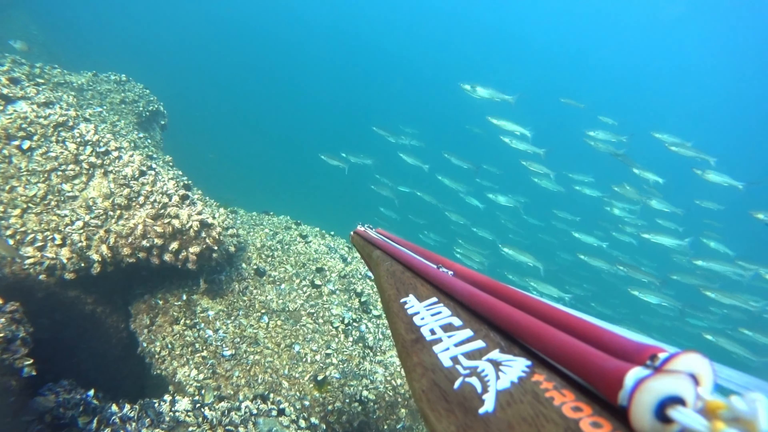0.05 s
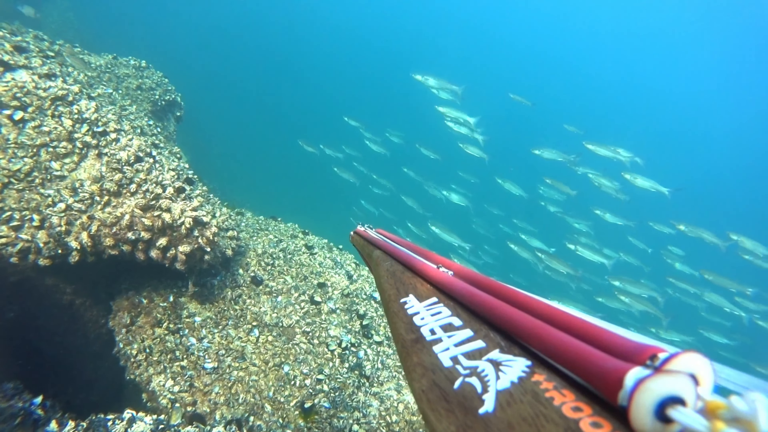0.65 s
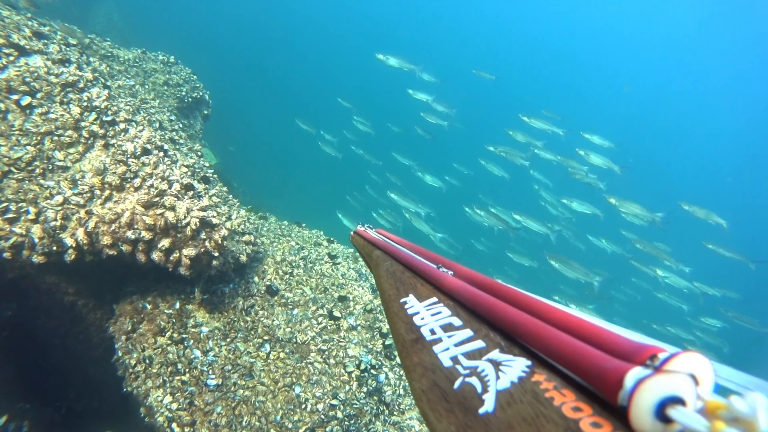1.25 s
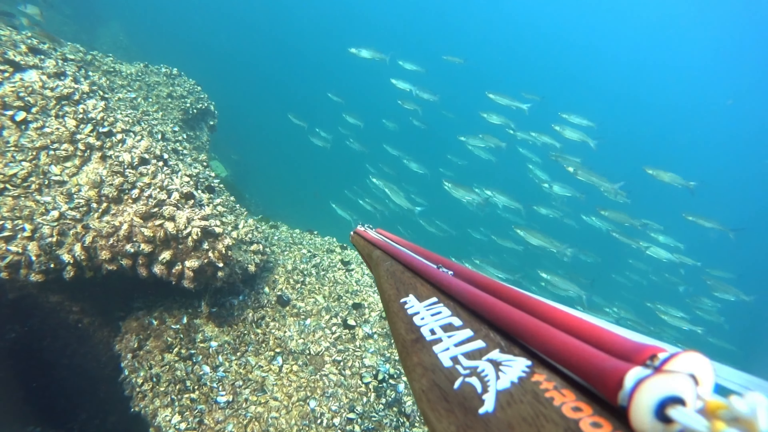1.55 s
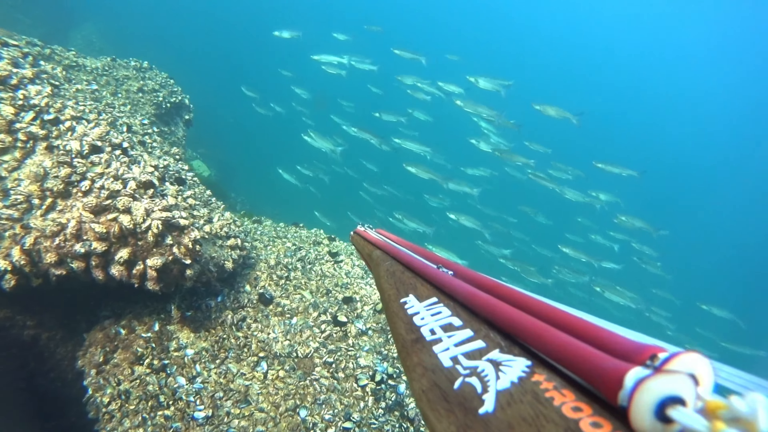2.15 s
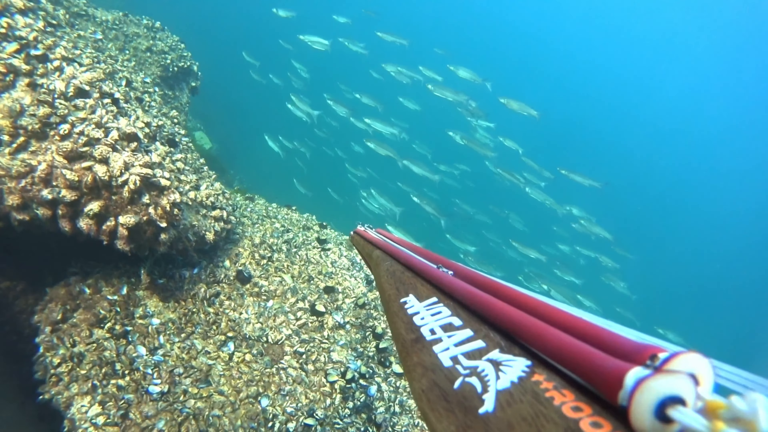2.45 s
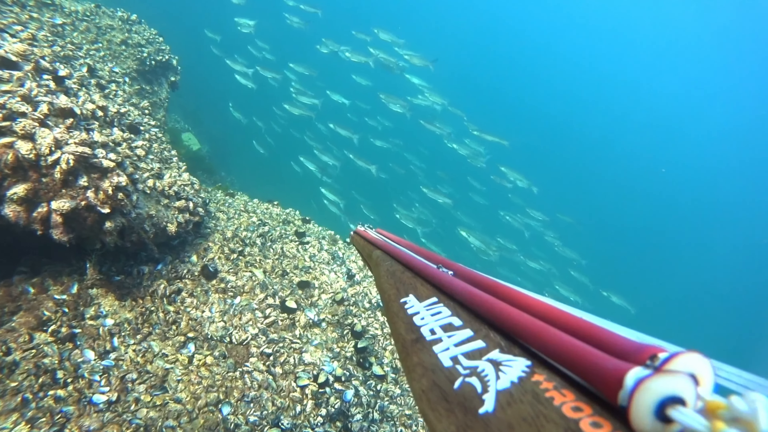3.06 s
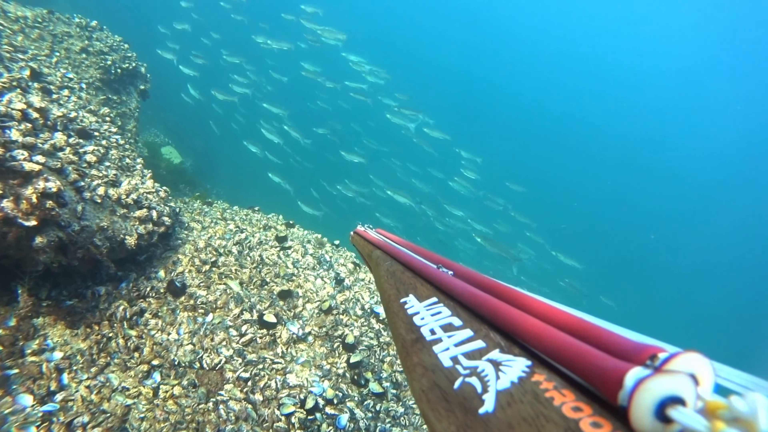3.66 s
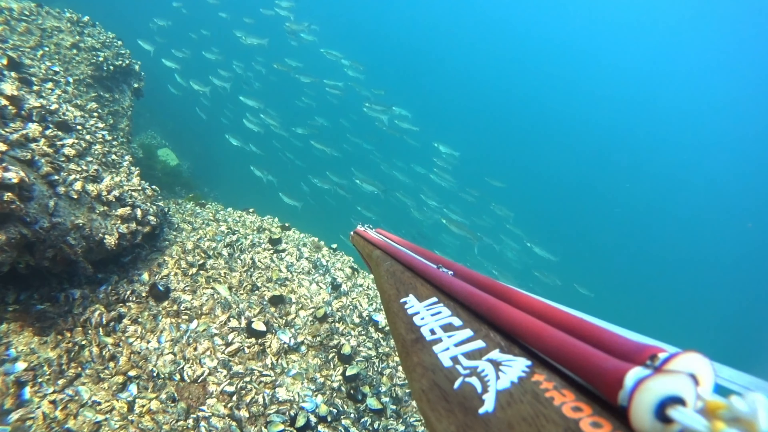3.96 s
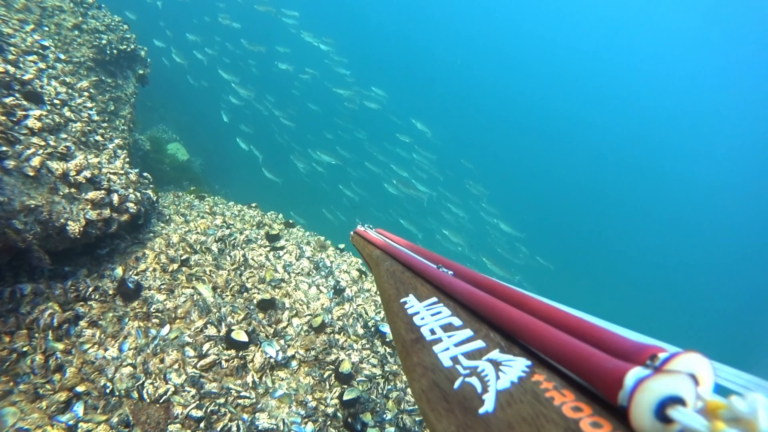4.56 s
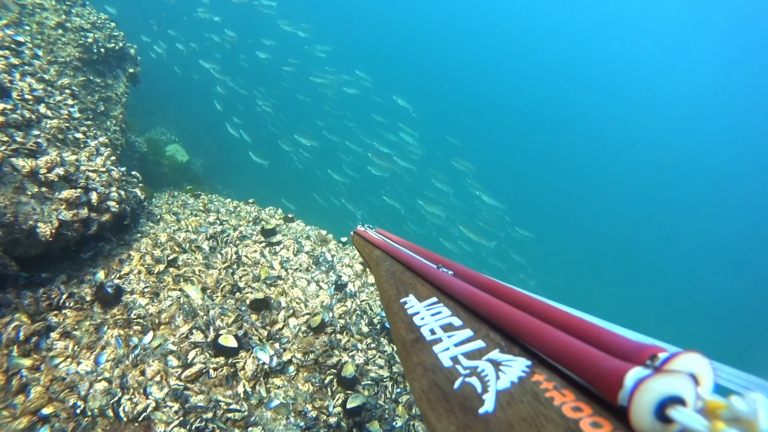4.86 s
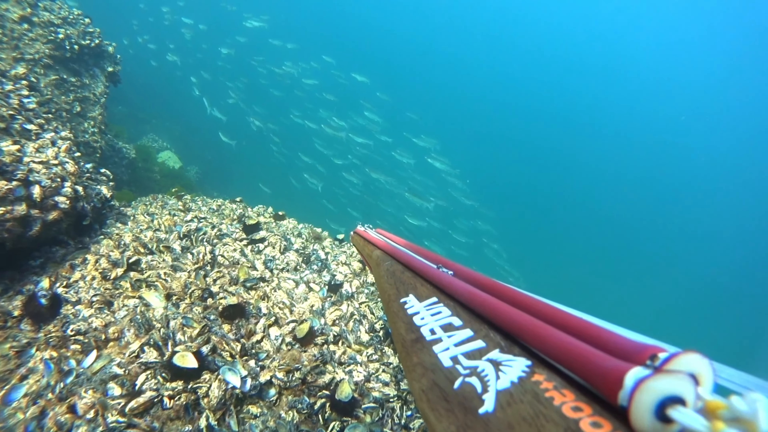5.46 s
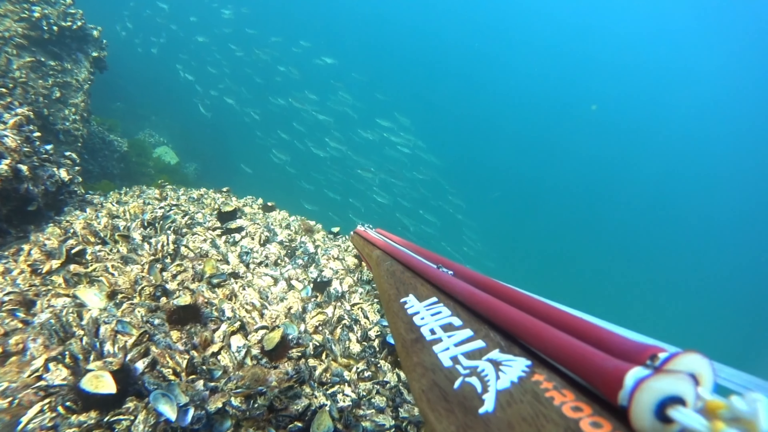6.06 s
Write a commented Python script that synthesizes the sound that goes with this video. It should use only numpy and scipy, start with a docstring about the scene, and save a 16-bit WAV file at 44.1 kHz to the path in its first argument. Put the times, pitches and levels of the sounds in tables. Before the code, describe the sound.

Underwater near rocks, snapping shrimp crackle faintly all around over a soft hiss, heard from inside a sealed camera housing. From about a second in, the mount sticks and slips in short, close creaks, with a few dull bumps among them. Near the end, four hard knocks strike the housing. They are the loudest sounds, and each leaves a brief low ring.

```python
"""Snapping shrimp crackle all around over a soft hiss, underwater near mussel-covered rocks.
The two microphones sit inside a sealed camera housing on a speargun and hear the sea through its walls.
From about a second in, the mount sticks and slips as the gun is moved: close creaks, a few dull bumps.
Four hard knocks near the end ring the housing, which hums on low after each."""
import sys
import numpy as np
from scipy import signal
from scipy.fft import irfft
from scipy.io import wavfile
from scipy.ndimage import uniform_filter1d

SR = 44100
rng = np.random.default_rng(int(sys.argv[2]) if len(sys.argv) > 2 else 0)


def transcribe(u):
    """Save the signal u as a 16-bit wav file named by the first command-line argument.

    u: samples, shape (n,) or (channels, n), limited to [-1, 1]; the rate is SR.
    q: integer samples, one column per channel.
    """
    v = np.clip(np.atleast_2d(u).T, -1, 1)
    q = np.round(v * 32767).astype(np.int16)
    wavfile.write(sys.argv[1], SR, q)


N = 278271
SIDES = np.array([.5, -.5])  # each microphone's share of a left-right offset


def gain_of(db):
    """Decibels to amplitude."""
    return 10 ** (np.asarray(db) / 20)


def rms(x):
    """Root mean square."""
    return np.sqrt(np.mean(x ** 2) + 1e-24)


def curve_at(points, hz):
    """A spectrum table, joined on a log-frequency axis."""
    f, value = np.transpose(points)
    return np.interp(np.log(hz + 1), np.log(f), value)


def add(mix, s, sound):
    """Mixes a stereo sound in at time s."""
    part = mix[:, max(round(s * SR), 0):][:, :sound.shape[1]]
    part += sound[:, :part.shape[1]]


def now_and_then(start, per_s, spread_db, count=100):
    """Irregular events at a given rate: (time [s], level about the mean [dB])."""
    when, strength = rng.random((count, 2)).T
    rows = np.c_[start + (np.arange(count) + when) / per_s, spread_db * (2 * strength - 1)]
    return rows[rows[:, 0] < N / SR]


def burst(t60, rise=0.000047, size=2048):
    """One sharp pop, scattered into a dense train of short echoes."""
    t = np.arange(size) / SR
    return rng.standard_normal(size) * gain_of(-60 * t / t60) * (1 - np.exp(-t / rise))


# The sea reaches the two microphones out of step: (frequency [Hz], left lead [rad])
WALL_LEAD = [(100, 1), (240, 1.9), (400, -1.1), (520, .9), (660, 2.1), (800, 1.5), (1050, 1.5), (1200, 1),
             (1450, 1.2), (1700, 1.6), (2000, 1.3), (2400, 2), (3500, 2), (4800, 1.8), (5800, 1.2),
             (8000, .8)]
def through_wall(x, colour, skew=0, size=2048):
    """Colours a sound and splits its phase between the microphones, skewed by its direction."""
    hz = np.fft.rfftfreq(size, 1 / SR)
    log_gain = np.log(gain_of(curve_at(colour, hz)))
    mirrored = np.r_[log_gain, log_gain[-2:0:-1]]
    causal = np.exp(np.conj(signal.hilbert(mirrored)))[:len(hz)]  # minimum phase
    phase = np.outer(SIDES, curve_at(WALL_LEAD, hz) + skew)
    early = size // 64  # room for the leading side
    taps = np.roll(irfft(causal * np.exp(1j * phase)), early, 1)[:, :size // 2]
    return signal.oaconvolve(x[None], taps, axes=1)[:, early:early + len(x)]


# The far reef, heard from inside the housing: (frequency [Hz], relative level [dB])
WASH_COLOUR = [(25, -11), (60, -30), (95, -14), (170, -21), (236, -2), (285, -16), (380, -1.5), (640, 2.5),
               (800, 1.5), (1000, 1), (1150, -4.5), (1500, -6), (1900, -8.5), (3300, -13.5), (4800, -16.5),
               (6200, -11.5), (7600, -18.5), (11000, -21.5)]
# Its loudness at the microphones: (time [s], level [dB])
WASH_LEVEL = [(0, -61), (1.2, -60.5), (2, -61), (4, -60.5), (6.3, -60)]
def reef_wash(flutter_db=-0.54, apart_db=-16):
    """The most distant snaps and moving water merge into a fluttering hiss."""
    flutter = uniform_filter1d(rng.standard_normal(N), SR // 40)
    hiss = rng.standard_normal(N) * gain_of(flutter_db * flutter / rms(flutter))
    shared = through_wall(hiss, WASH_COLOUR, size=8192)
    apart = through_wall(rng.standard_normal(N), WASH_COLOUR, size=8192) * [[1], [-1]]
    x = shared + gain_of(apart_db) * apart
    level_db = np.interp(np.arange(N) / SR, *np.transpose(WASH_LEVEL))
    return gain_of(level_db) * x / rms(x)


# A snap through the wall, its bright tick and its lower ring: (frequency [Hz], relative level [dB])
TICK_COLOUR = [(1500, -21), (2800, -6.5), (4200, -2), (5200, 0), (6100, 5.5), (7500, -5.5), (9000, -2.5),
               (11000, -11.5)]
RING_COLOUR = [(300, -19.5), (650, -19), (900, 3.5), (1150, -2), (1450, 8), (1700, 0.5), (2000, -3.5),
               (2400, -4), (3200, -15.5), (5000, -37.5)]
def shrimp_crackle(colour, per_s, db, t60, spread_db, skew_rad=0.99, directions=10):
    """Many shrimp at middle distance, all around, snap at random with uneven strength."""
    x = np.zeros((2, N))
    for _ in range(directions):
        strength = gain_of(spread_db * np.minimum(rng.exponential(1, N), 3))
        pop = through_wall(burst(t60), colour, skew_rad * rng.standard_normal())
        fires = rng.random(N) < per_s / directions / SR
        x += signal.oaconvolve((strength * fires)[None], pop, axes=1)[:, :N]
    return gain_of(db) * x / rms(x)


# Modes of the housing, right around the microphones:
# (frequency [Hz], t60 [s], knocked level [dB], left over right [dB], relative rubbed level [dB])
HOUSING_MODES = [(39.6, 0.67, -68, -23, -72), (90.7, 0.54, -60, 10.5, -46.5), (238.9, 0.39, -26, 3, -16.5),
                 (306.5, 0.3, -50, 8.5, -32), (381, 0.12, -10.5, -3, -7), (477.8, 0.057, -14, 3.5, -4),
                 (546.6, 0.034, -7.5, 0, -7.5), (607, 0.037, -6.5, 5.5, -6), (649.4, 0.066, -15, 0, -22),
                 (796, 0.034, -17.5, -18.5, -16.5), (871, 0.039, -5, -1, -3.5),
                 (934.4, 0.079, -10, -3, -11.5), (996.5, 0.062, -13.5, 12, -14.5),
                 (1133, 0.023, -7.5, -0.5, -3.5), (1310, 0.019, 1.5, -1, 5.5), (1454, 0.011, 15.5, -1.5, 6),
                 (1847, 0.024, -16, -15.5, -13.5), (1964, 0.012, -6.5, 11.5, -1.5),
                 (2374, 0.0069, -36, 2.5, -8)]
MODE_HZ, MODE_T60, KNOCKED_DB, PAN_DB, RUBBED_DB = np.transpose(HOUSING_MODES)
# The left wall against the right, mode by mode: (left lead [rad])
MODE_PHASE = [0, .8, 2.1, -3.7, -1.2, -1.2, .4, 2.8, 1.8, 1.1, 1.3, -3.7, 2.2, 2, 2.6, 2.7, .8, -1.6, 2.3]
def housing(t, level_db, build_s=0.0069):
    """Each mode's ring at both microphones; neighbours swing in opposite sense and build up briefly."""
    side = SIDES[:, None, None]
    sense = (-1) ** np.arange(len(MODE_HZ))[:, None]
    phase = 2 * np.pi * MODE_HZ[:, None] * t + side * np.array(MODE_PHASE)[:, None]
    ring_db = level_db[:, None] + side * PAN_DB[:, None] - 60 * t / MODE_T60[:, None]
    return sense * np.sin(phase) * gain_of(ring_db) * (1 - np.exp(-t / build_s))


def housing_hum(db=-79):
    """The moving water keeps two low modes of the housing faintly humming."""
    t = np.arange(SR // 2) / SR
    ring = ((MODE_HZ > 80) & (MODE_HZ < 300)) @ housing(t, RUBBED_DB)
    water = rng.standard_normal((1, N + len(t) - 1))
    x = signal.oaconvolve(water, ring, "valid", axes=1)
    return gain_of(db) * x / rms(x)


def snap(tick_db, ring_db, reference_t60=.017, reference_db=-57.5, halving_db=30, skew_rad=0.076):
    """A shrimp's bubble collapses: a bright tick, and a longer, lower ring in the wall."""
    t60 = reference_t60 * 2 ** ((reference_db - tick_db) / halving_db)  # louder is nearer, so drier
    out = 0
    for colour, db, decay in ((TICK_COLOUR, tick_db, t60), (RING_COLOUR, ring_db, 1.77 * t60)):
        pop = through_wall(burst(decay), colour, skew_rad * rng.standard_normal())
        out = out + gain_of(db) * pop / rms(pop[:, :SR // 125])
    return out


# The shrimp closest to the microphones: (time [s], tick level [dB], ring level [dB])
NEAR_SNAPS = [(.0901, -54.5, -46.5), (.1412, -58.5, -49.5), (.3313, -52, -50), (.3969, -49, -44.5),
              (.6634, -52.5, -46.5), (0.706, -77, -55), (.9406, -53.5, -58), (1.1581, -58, -55),
              (1.2052, -53.5, -63), (1.226, -51, -48.5), (1.7017, -55.5, -59.5), (1.8816, -57, -67),
              (2.2257, -64, -53.5), (2.4396, -54, -62), (2.4765, -58.5, -47.5), (3.3443, -51.5, -64),
              (3.564, -60.5, -51), (3.66, -50.5, -48.5), (3.6983, -46.5, -59), (3.8265, -34, -41.5),
              (3.9343, -55.5, -53.5), (4.0528, -53, -51.5), (4.2597, -47.5, -64), (4.4634, -48, -51),
              (4.9162, -54, -51), (5.192, -60, -55), (5.3691, -51, -49), (5.9342, -57, -43),
              (6.1136, -58, -47.5), (6.157, -57, -54.5)]
def near_shrimp(stray_tick_db=-62.5, stray_ring_db=-67.5):
    """The nearest shrimp, and stray snaps from the rocks just beyond."""
    out = np.zeros((2, N))
    for s, tick_db, ring_db in NEAR_SNAPS:
        add(out, s, snap(tick_db, ring_db))
    for s, db in now_and_then(0, per_s=5, spread_db=3):
        add(out, s, snap(stray_tick_db + db, stray_ring_db + db))
    return out


def creak(modes, length, low_db, upper_db, slips_per_s=1500, spread_db=3, vary_db=1.5, scrape_db=-11):
    """The mount sticks and slips: one firm kick and a short run of uneven ones drive the housing."""
    n = int(length * SR)
    chance, size, sign = rng.random((3, SR // 10))[:, :n]
    kicks = (chance < slips_per_s / SR) * gain_of(-spread_db * np.log(size)) * np.sign(sign - .5)
    kicks *= np.sqrt(np.hanning(n))
    kicks[n // 14] += 2  # the firm kick
    # each place of contact drives the modes with its own strengths and signs
    spot = gain_of(vary_db * rng.standard_normal(len(MODE_HZ))) * rng.choice([-1, 1], len(MODE_HZ))
    is_low = MODE_HZ < 700
    low, upper = (spot * is_low) @ modes, (spot * ~is_low) @ modes
    # the many weak modes of the mount blur into a scrape
    scrape = through_wall(burst(t60=0.014), RING_COLOUR)
    out = np.zeros((2, n + modes.shape[-1]))
    for db, response in ((low_db, low), (upper_db, upper), (upper_db + scrape_db, scrape)):
        ring = signal.fftconvolve(kicks[None], response, axes=1)
        add(out, 0, gain_of(db) * ring / rms(ring[:, :n + SR // 160]))
    return out


# The mount, hard against the housing: (time [s], length [s], low level [dB], upper level [dB])
FIRM_CREAKS = [(1.02, .009, -47, -44), (1.371, 0.0084, -54.5, -45), (1.413, .017, -52.5, -52),
               (1.543, 0.014, -53, -56.5), (1.752, 0.0046, -54, -49.5), (2.137, .033, -47.5, -46.5),
               (2.312, 0.0073, -37.5, -44), (2.327, .017, -52, -41.5), (2.356, .009, -42, -33.5),
               (2.518, 0.015, -44, -40.5), (2.615, 0.0076, -53, -49), (2.63, 0.012, -49, -41.5),
               (2.648, 0.011, -46.5, -37), (2.751, 0.03, -66, -52), (2.893, 0.018, -51, -40.5),
               (2.955, 0.0099, -53, -46.5), (3.046, 0.014, -50, -42.5), (3.245, 0.007, -53, -52),
               (3.268, 0.014, -44, -48), (3.399, .014, -57, -48), (3.583, 0.011, -62, -48.5),
               (3.64, 0.0094, -51.5, -51), (3.703, 0.0067, -61, -44.5), (3.719, .014, -51, -45),
               (4.034, 0.024, -52, -53), (4.061, 0.04, -51, -50.5), (4.238, 0.0088, -53, -42.5),
               (4.417, 0.024, -47.5, -46.5), (4.55, 0.074, -50, -49), (4.657, 0.02, -49, -42),
               (4.812, 0.019, -49.5, -48), (4.844, 0.034, -49.5, -47), (5.005, 0.018, -53, -47.5),
               (5.166, .017, -50.5, -48), (5.183, .026, -49.5, -49), (5.43, .014, -57, -43),
               (5.549, 0.051, -48, -45), (5.74, 0.046, -58.5, -51), (5.788, 0.015, -50.5, -44),
               (5.973, 0.052, -53.5, -46.5)]
def mount_creaks(stick_s=0.02, stick_spread_s=0.02, settle_db=-15.5, moving_from_s=1.7):
    """Firm creaks, each sticking, then settling with a weaker one; faint ones once the gun is moving."""
    out, t = np.zeros((2, N)), np.arange(SR // 3) / SR
    modes = housing(t, RUBBED_DB, build_s=0.0026)
    for s, length, low_db, upper_db in FIRM_CREAKS:
        add(out, s, creak(modes, length, low_db, upper_db))
        settles = s + length + stick_s + stick_spread_s * rng.random()
        add(out, settles, gain_of(settle_db) * creak(modes, .012, low_db, upper_db))
    for s, db in now_and_then(moving_from_s, per_s=6, spread_db=4):
        add(out, s, gain_of(db) * creak(modes, length=.012, low_db=-59.5, upper_db=-56))
    return out


# Dull bumps on the housing, a little to the left: (time [s], level [dB], frequency [Hz], t60 [s])
DULL_BUMPS = [(2.3106, -33.5, 174, 0.065), (2.336, -36.5, 240.2, 0.3), (2.639, -42.5, 236.8, 0.26),
              (4.6, -45, 237.4, 0.44)]
def bumps(push_db=-24, push_t60=0.021, rise_s=0.015):
    """A soft blow: a low thud with a brief push on the wall."""
    out, t = np.zeros((2, N)), np.arange(SR // 2) / SR
    push = gain_of(push_db - 60 * t / push_t60)
    for s, db, hz, t60 in DULL_BUMPS:
        thud = np.sin(2 * np.pi * hz * t) * gain_of(-60 * t / t60) * (1 - np.exp(-t / rise_s))
        add(out, s, gain_of(db) * np.outer([1, .7], thud + push))
    return out


# Hard knocks on the housing, right at the microphones: (time [s], ring gain [dB], crack level [dB])
HARD_KNOCKS = [(5.265, 0.5, -34), (5.637, 0, -32), (5.9101, 1, -29), (6.237, 1.5, -30)]
# The crack at the contact, heard from inside: (frequency [Hz], relative level [dB])
CRACK_COLOUR = [(1500, -14), (2500, -1.5), (3200, -1), (3800, 3.5), (5000, -6), (5550, 10), (6300, -2),
                (7400, -7), (8400, -3.5), (11000, -21.5)]
def knocks(tail_db=-33, tail_t60=0.059, crack_t60=0.013, rise_s=0.0022, vary_db=0.56):
    """Each knock cracks at the contact and sets all modes ringing."""
    out, t = np.zeros((2, N)), np.arange(SR * 5 // 4) / SR
    modes = housing(t, KNOCKED_DB)
    for s, db, crack_db in HARD_KNOCKS:
        spot = gain_of(vary_db * rng.standard_normal((len(MODE_HZ), 1)))
        add(out, s, gain_of(db) * (spot * modes).sum(1))
        # the many weak modes of the mount blur into a short, rough tail
        tail = through_wall(burst(tail_t60, rise_s, size=4096), RING_COLOUR)
        add(out, s, gain_of(db + tail_db) * tail / rms(tail[:, :SR // 100]))
        crack = through_wall(burst(crack_t60, rise_s), CRACK_COLOUR)
        add(out, s - .0008, gain_of(crack_db) * crack / rms(crack[:, :SR // 200]))
    return out


def scene():
    """Close housing noises over the crackling reef."""
    bright = shrimp_crackle(TICK_COLOUR, per_s=57, db=-69.5, t60=0.056, spread_db=8.0)
    dull = shrimp_crackle(RING_COLOUR, per_s=70, db=-70.5, t60=0.034, spread_db=2.5)
    handling = knocks() + mount_creaks() + bumps()
    return handling + near_shrimp() + bright + dull + reef_wash() + housing_hum()


def record(dry, edge_hz=11200):
    """The camera's band limit."""
    lowpass = signal.firwin(255, edge_hz, window=("kaiser", 7), fs=SR)
    return signal.oaconvolve(dry, lowpass[None], "same")


dry = scene()
out = record(dry)
transcribe(out)
```